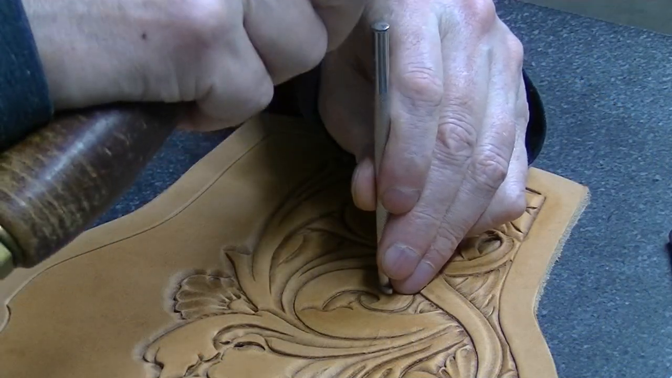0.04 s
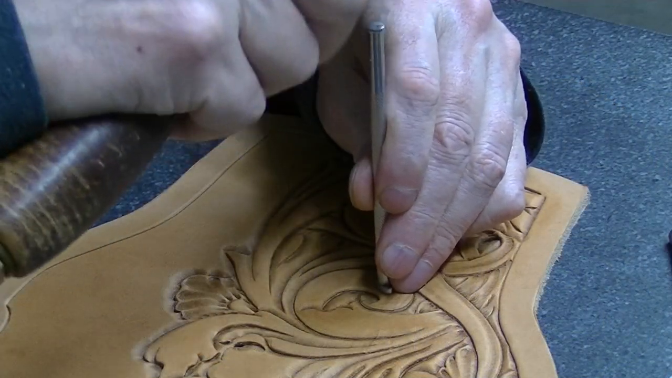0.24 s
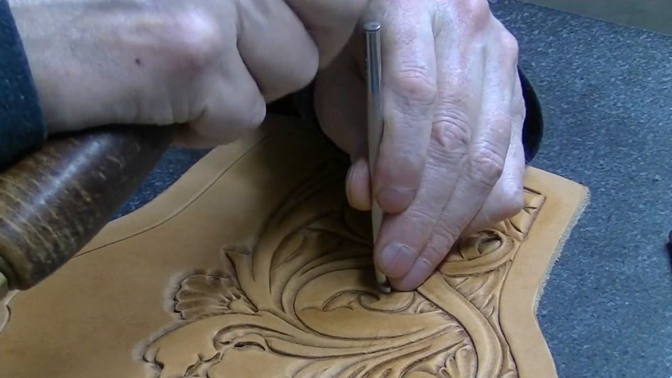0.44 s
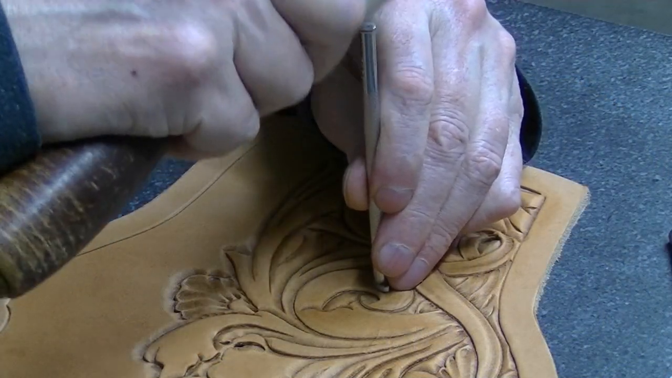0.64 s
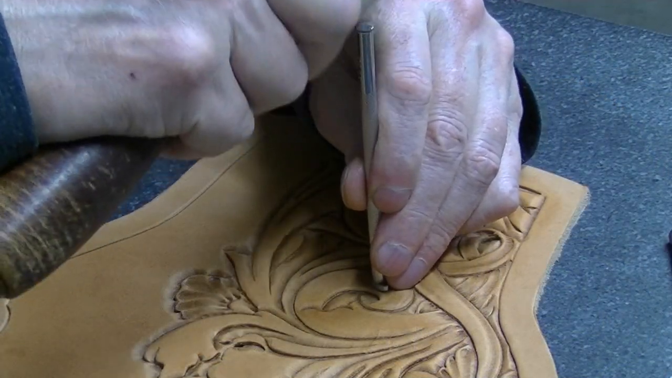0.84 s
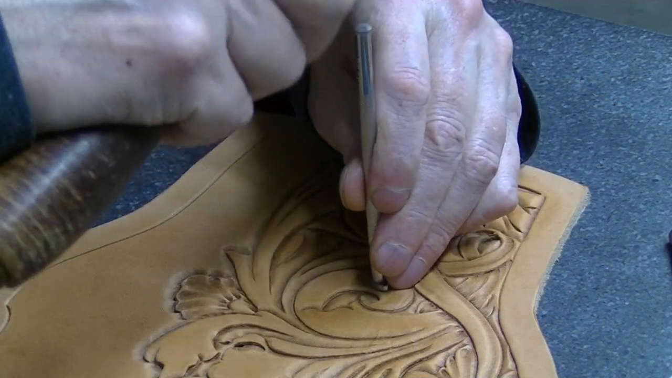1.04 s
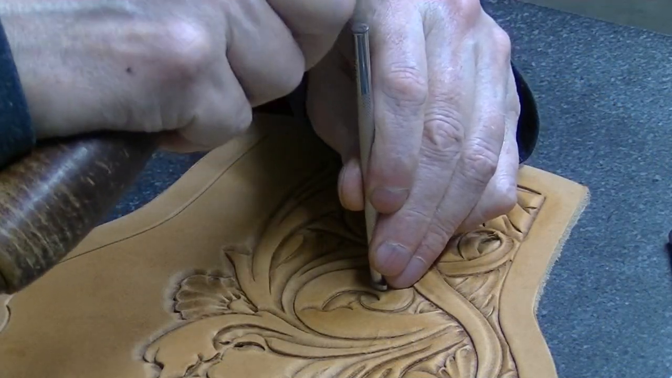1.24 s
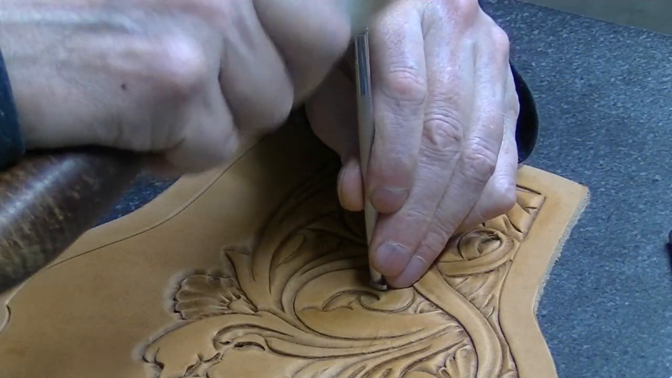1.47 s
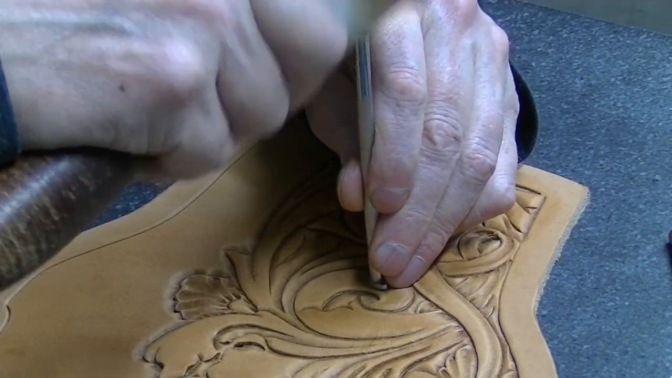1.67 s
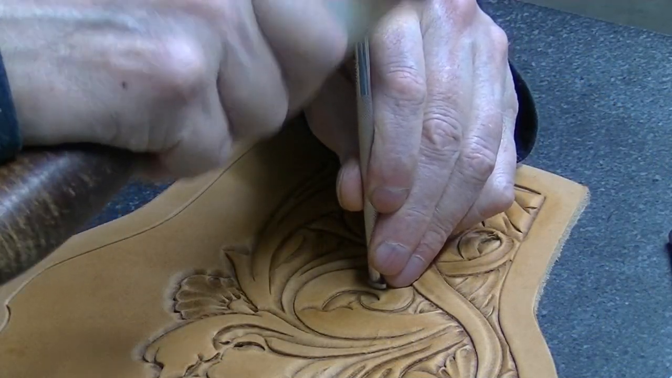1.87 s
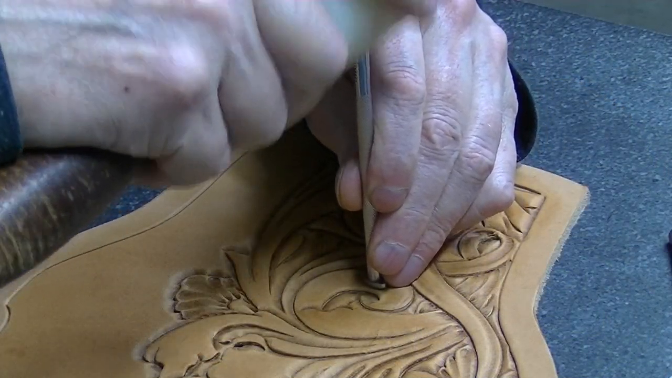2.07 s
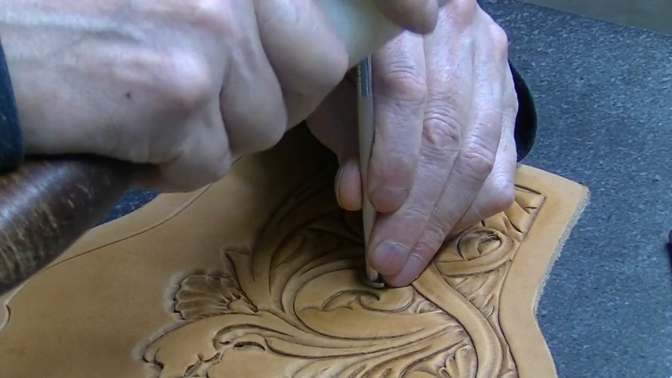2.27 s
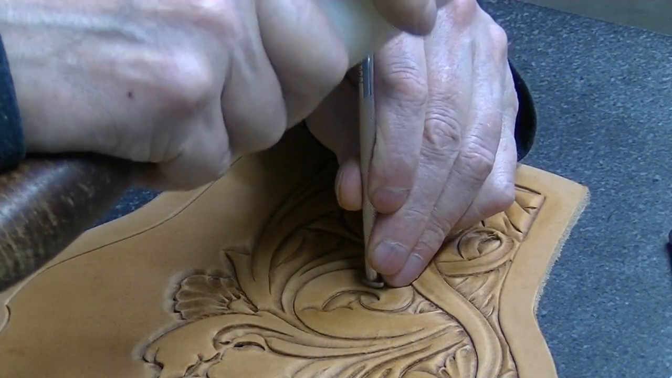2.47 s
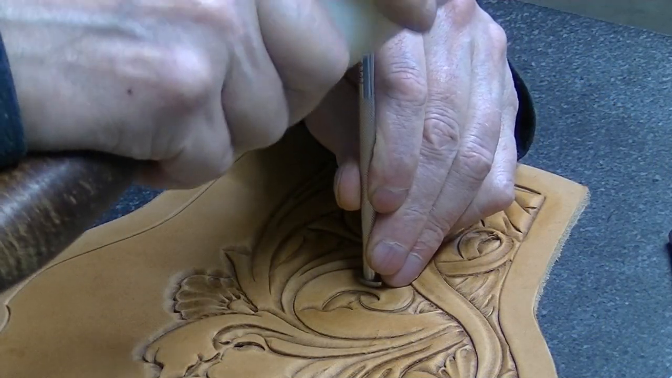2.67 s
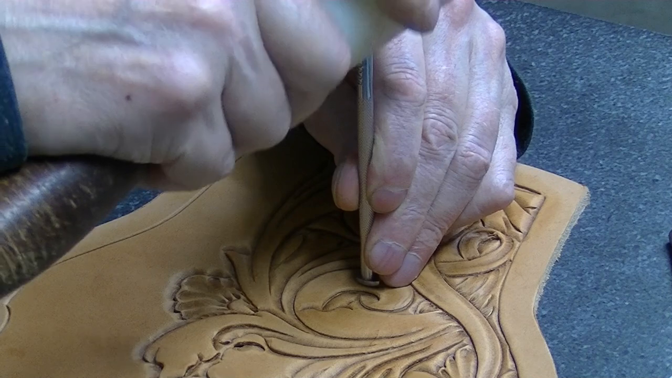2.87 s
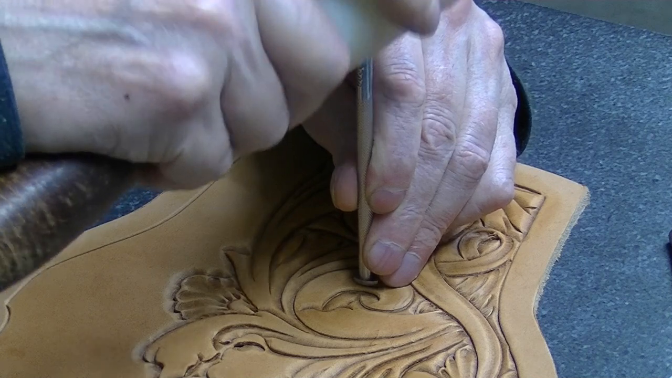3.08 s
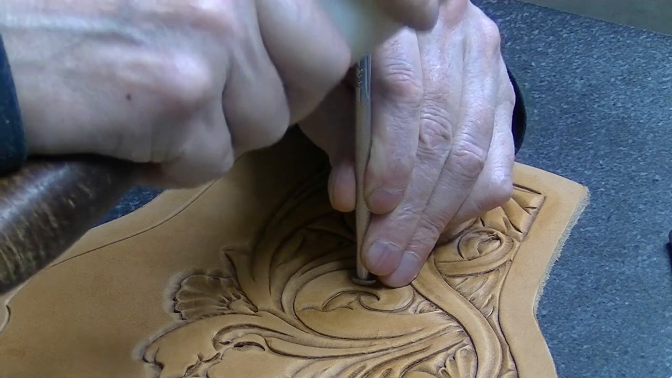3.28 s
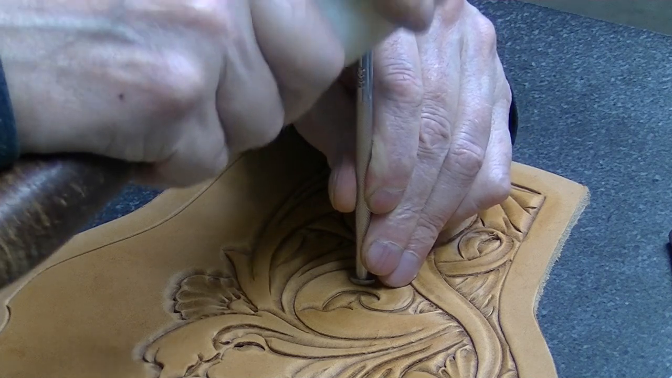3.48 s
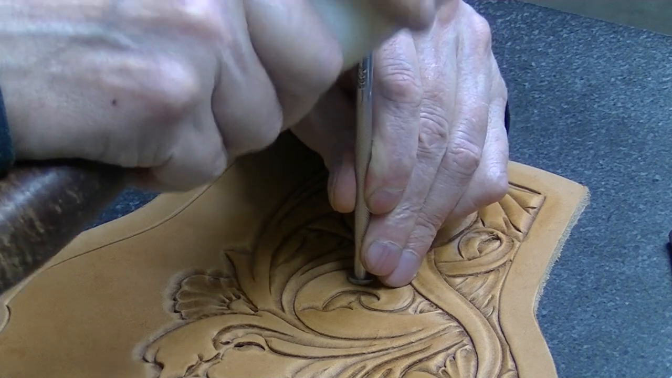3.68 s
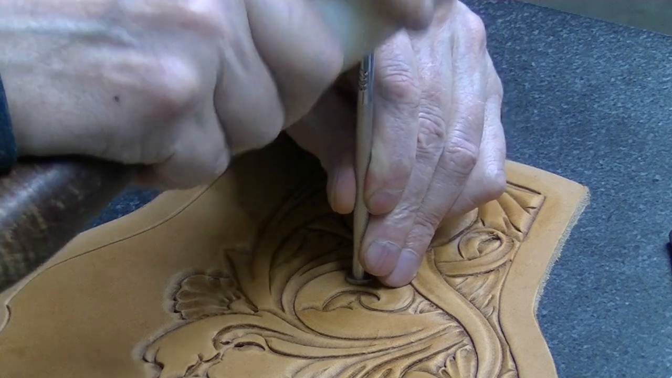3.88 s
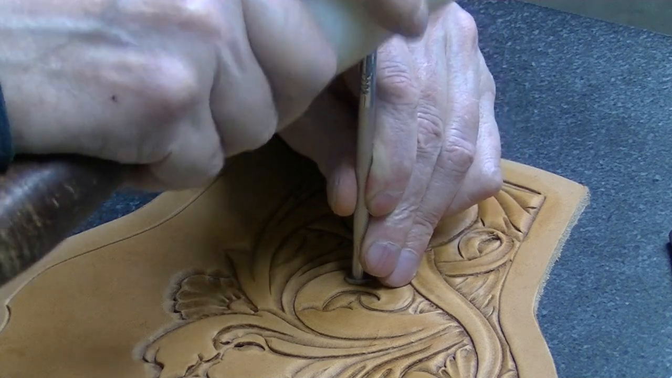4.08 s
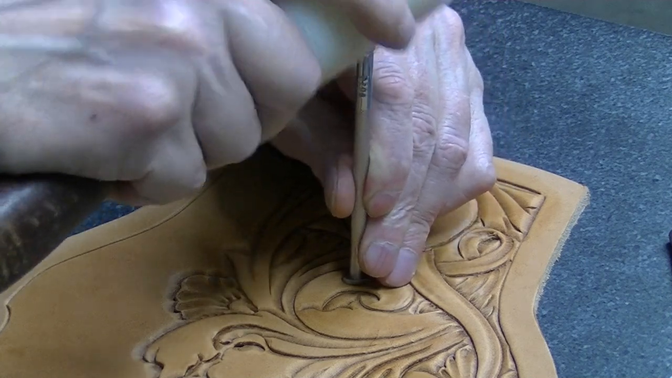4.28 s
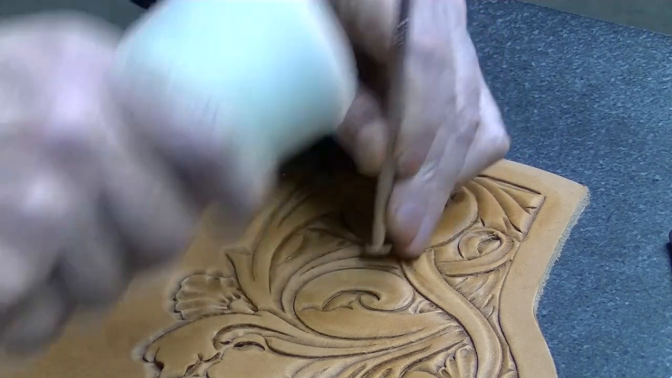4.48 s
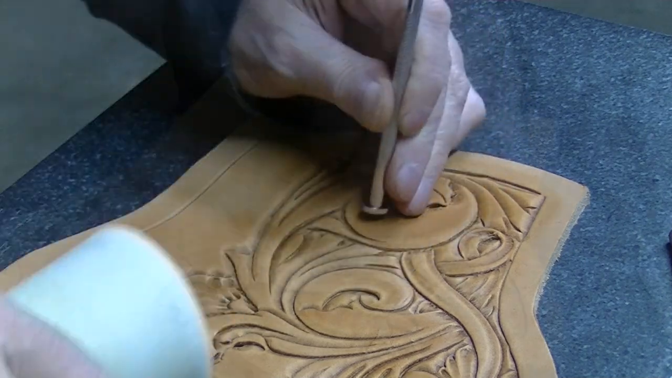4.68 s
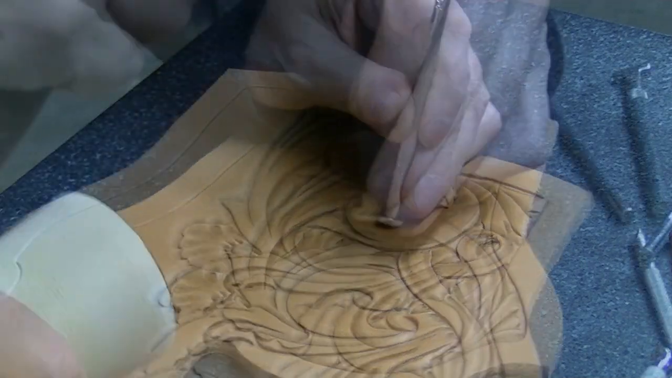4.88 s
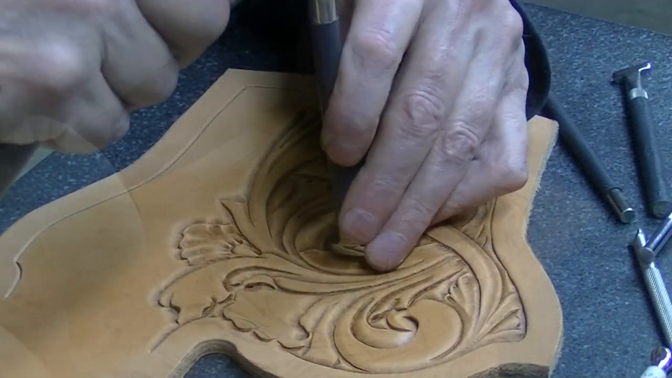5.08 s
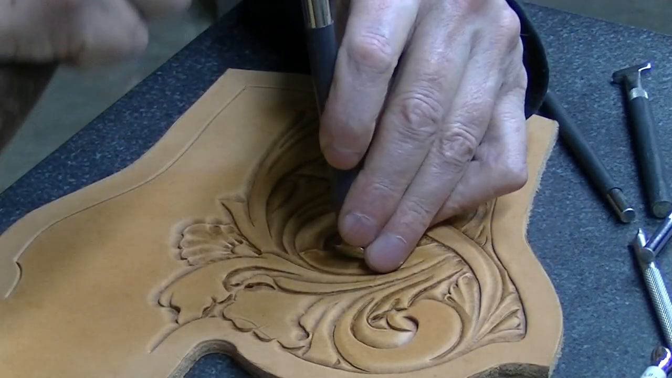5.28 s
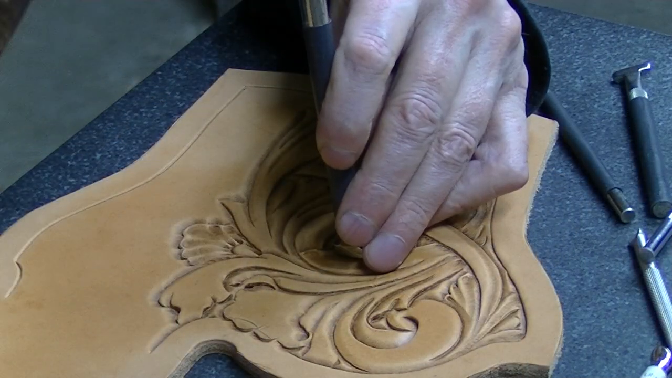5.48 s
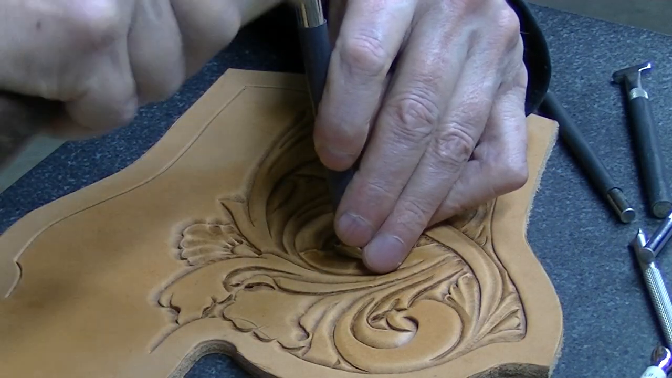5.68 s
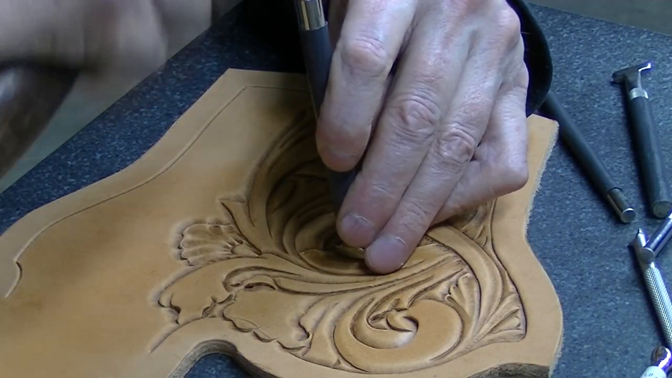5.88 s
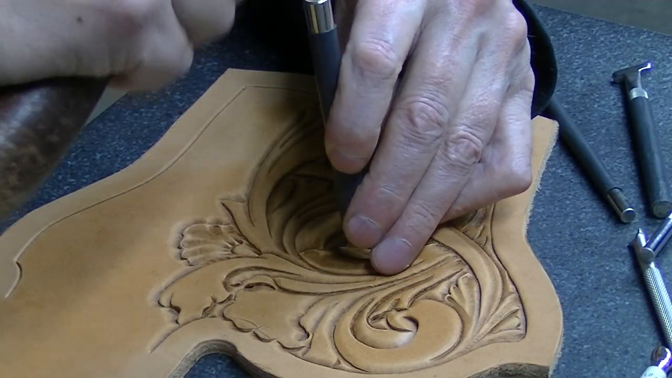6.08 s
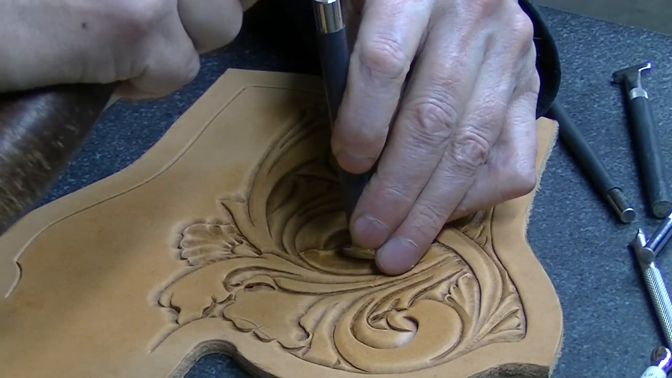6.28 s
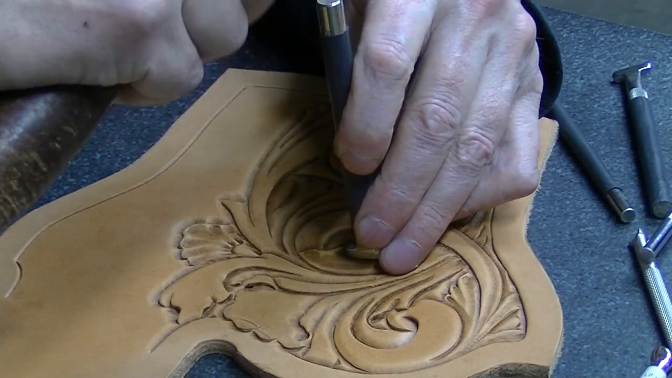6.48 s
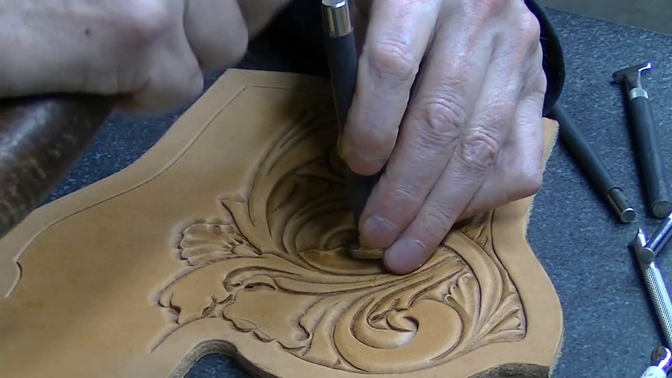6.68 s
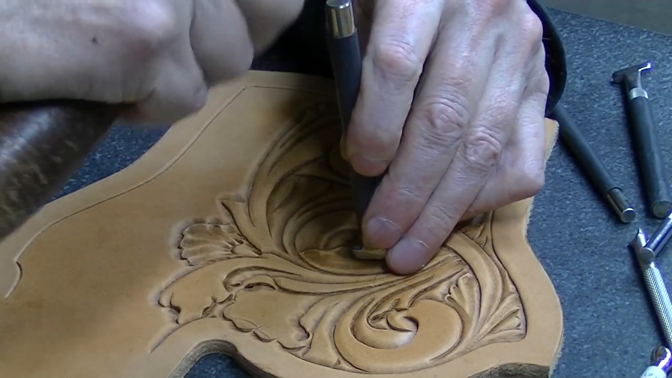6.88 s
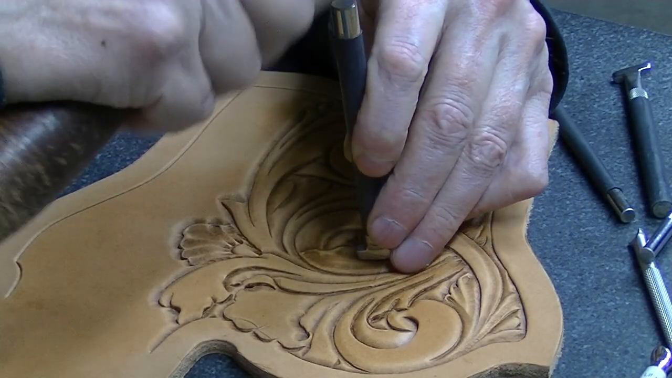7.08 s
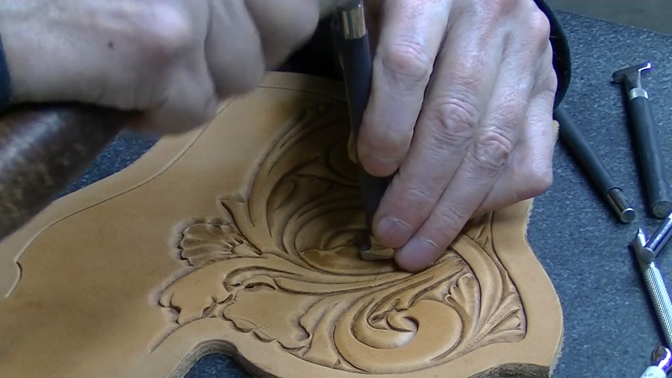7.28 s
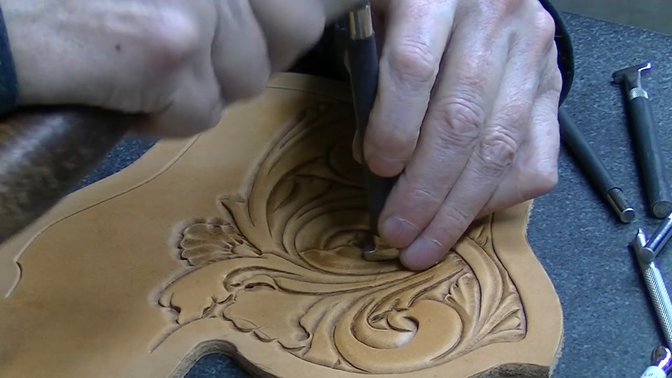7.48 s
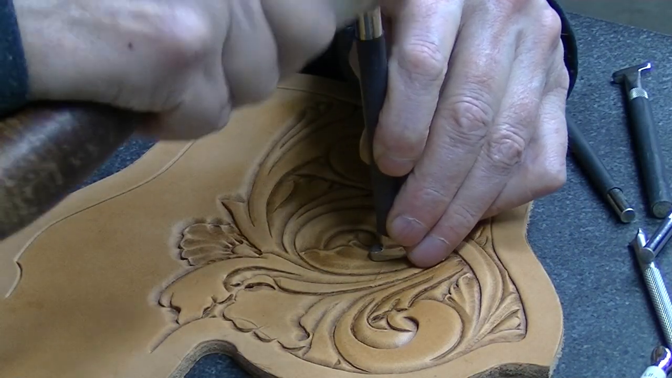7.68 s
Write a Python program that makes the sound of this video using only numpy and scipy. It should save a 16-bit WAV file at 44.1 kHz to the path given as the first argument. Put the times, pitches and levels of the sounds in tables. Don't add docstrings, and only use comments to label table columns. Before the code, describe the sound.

A hard mallet taps a thin steel stamp into leather about five times a second, pauses, then taps a thicker stamp louder and heavier.

```python
import sys
import numpy as np
from scipy import signal
from scipy.fft import rfft, irfft
from scipy.io import wavfile
from scipy.ndimage import uniform_filter1d

SR = 44100
rng = np.random.default_rng(int(sys.argv[2]) if len(sys.argv) > 2 else 0)


def amplitude_ratio(level_db):
    exponent = np.asarray(level_db, float) / 20
    return 10 ** exponent


def generate_wav(signal):
    frames = np.transpose(np.atleast_2d(signal))
    scaled = np.clip(frames, -1, 1) * 32767
    pcm = np.round(scaled).astype(np.int16)
    wavfile.write(sys.argv[1], SR, pcm)


N = 341334
T = np.arange(N) / SR
LEAD = SR // 10

# t/s, strength/dB, off-centre aim/dB, brightness/dB
THIN_BLOWS = [(-0.04, -13.5, 1, -1.5), (0.1545, -12, 2, -4.5), (0.356, -10.5, 0.5, -1.3),
              (0.5615, -11, 0.5, -2), (0.7615, -13, 1, -3.5), (0.9505, -12.5, 2, 2), (1.1485, -11, 0, 1),
              (1.3465, -12, 1.5, -1.5), (1.534, -12, 1, -1), (1.726, -12.5, 0.5, -0.5),
              (1.922, -12, 1.5, -2), (2.1125, -13, 1, -1.5), (2.2985, -13.5, 2, -2),
              (2.4955, -13, 1.5, -1.5), (2.694, -13.5, 1, -0.5), (2.884, -13, 1.5, 4.5),
              (3.0775, -13.5, 1.5, 3), (3.2765, -13, 1.5, -2.5), (3.471, -13.5, -0.5, -1.5),
              (3.659, -15, -0.5, -0.5), (3.851, -13.5, -2, -1.5), (4.0435, -14, -21, 2.5),
              (4.236, -14, 1, 3.5)]
THICK_BLOWS = [
    (5.6947, -13.5, -1, 5.5),
    (5.9461, -12.5, 12, 2.5),
    (6.166, -11.5, 5.5, -5.5),
    (6.381, -13, 0, -8.5),
    (6.599, -13, 1, -2),
    (6.813, -13, 3, -1.5),
    (7.024, -13, -5, -10.5),
    (7.2355, -13, 0.5, -4),
    (7.447, -14.5, -6, -5),
    (7.6531, -13.5, -6, 1),
]
# f/Hz, level/dB, t60/s
THIN_CRACK = [(718, -9, 0.017), (1056, -2, 0.008), (1757, -7, 0.0095), (2462, 1.5, 0.0072),
              (3775, -13.5, 0.024), (4420, -5.5, 0.0054), (6500, -15.5, 0.0032), (7050, -17, 0.0038),
              (11200, -17, 0.0016), (12500, -23.5, 0.0019)]
THICK_CRACK = [(875, -19, 0.019), (1172, 13, 0.0082), (1457, 11, 0.0057), (2500, 10, 0.0019),
               (3600, 4, 0.013), (5040, 10.5, 0.0017), (7600, -45, 0.0024), (10100, 3.5, 0.0046),
               (13500, -40, .003)]
# f/Hz, level/dB, t60/s
THIN_RING = [
    [(2170, -6.5, 0.029), (2470, -5, 0.0022)],
    [(2500, -4, 0.0026), (2910, -9, 0.0077)],
    [(3778, -6.5, 0.035), (3755, -21, 0.0073)],
    [(4000, 1.5, 0.0044), (4410, -16, 0.013)],
]
THICK_RING = [
    [(2133, 9.05, 0.029), (2256, 5.1, 0.006)],
    [(2500, 9.5, 0.0026), (2700, 6.5, 0.016)],
    [(3833, 0.66, 0.022), (3950, 0.75, 0.009)],
    [(4490, 8.5, 0.01), (4720, -16, 0.0092)],
]
# delay/s, level/dB
THIN_CHATTER = [(0, 3), (.0006, 0.5), (.0012, 4.5), (.0021, 3)]
THICK_CHATTER = [(0, 11.5), (.0006, -16.5), (.0012, 5), (.0019, -24)]
# f/Hz, level/dB
THIN_CLAP = [(400, 12), (900, 0), (1500, 6), (1950, -1), (2900, 6.5), (3400, -15), (4700, -17),
             (5500, -16.5), (6500, -13), (8000, -23), (13000, -33.5)]
THICK_CLAP = [(400, 18), (900, 11), (1500, 15.5), (1950, 4.5), (2700, -7.5), (3200, 10), (4700, 0.5),
              (5500, 5.5), (6500, -0.5), (8000, -4), (13000, -10.5)]
# low/dB, aim/dB past which the low ring is lost, high/dB,
# high dB per aim dB, high dB per brightness dB, top dB per aim dB
THIN_SHAFT = (0.4, 6, 0.1, 2.73, 0.62, 0.26)
THICK_SHAFT = (5.5, 10, 11.5, -0.2, 0.7, 0.2)
LOW_LOSS = 2.2
STRIKE_LAG_S = .0005

# f/Hz, level/dB, t60/s
BENCH_MODES = [(63.8, -53, 0.37), (123, -24, 0.11), (138.1, -36, 0.45), (157.9, -38.5, 0.52),
               (171.73, -22, 0.44), (197.2, -24, 0.26), (214.1, -35, 0.87), (228.5, -29, 0.37),
               (261.9, -39, 0.48), (280.54, -26.5, 0.51), (287.1, -24, 0.23), (308.4, -26.5, 0.34),
               (342.8, -27, 0.2), (373.5, -40.5, 0.87), (421, -29.5, 0.049), (464, -26, 0.19),
               (492, -29, 0.13), (534, -27, 0.16)]
BENCH_SWING = [1, 1, -1, -1, 1, -1, 1, 1, -1, -1, 1, -1, 1, 1, 1, -1, 1, 1]
# f/Hz, level/dB, t60/s
SLAB_KNOCK = [(245, -10.5, 0.012)]
# f/Hz, gain/dB
BENCH_PICKUP = [(30, -42), (62, -19), (85, -8), (120, -2.45), (330, -0.5), (520, -4)]
PUSH_S, THUMP_LAG_S = .002, .0018
THIN_THUMP_DB, THICK_THUMP_DB = 0, 6.5

# delay/s, level/dB
ECHOES = [(.0075, -4), (.012, -24)]
# f/Hz, gain/dB
ECHO_COLOUR = [(800, -14.5), (2500, -8.5), (3800, -3), (5000, -3.5), (12000, -9.5)]
# f/Hz, level/dB, t60/s
ROOM = [(536, -30, 0.45), (985, -26, 0.4), (2050, -27.5, 0.39), (3560, -28.5, 0.42), (6120, -29.5, .36),
        (9200, -29.5, 0.35), (13100, -27.5, 0.23)]
ROOM_START_S, ROOM_RISE_S = .003, .006

# start/s, end of hold/s, level/dB, fall/(dB/s)
DRONES = [
    (-1, .3, -45, 6),
    (3.15, 4.75, -53, 60),
    (.6, 1.5, -56, 9),
    (4.2, 4.8, -55, 80),
]
DRONE_HZ = [59.7, 58.5, 73.8, 75.]
DRONE_RISE_DB_S = 20

# f/Hz, level/dB
AIR = [(25, -36), (45, -7), (80, 0.5), (110, 4), (200, -1.5), (260, -1), (410, -3), (500, -10.5),
       (1650, -13.5), (2200, -19.5), (5000, -29), (11000, -58), (15000, -40), (15800, -59)]
# t/s, level/dB
AIR_SWELL = [(0, 2.5), (4.4, -4.5), (5.05, -9), (7.74, -4.5)]
# f/Hz, level/dB
WHINE = [(14783, -79)]
AIR_DB = -49.5

# middle t/s, level/dB, half length/s
STROKES = [
    (4.503, -74, 0.066),
    (4.902, -72.5, .02),
]
SLEEVE_REST_DB, SLEEVE_FALL_DB_S = -82, 69
# t/s, peak level/dB, f/Hz, t60/s
TICKS = [
    (4.733, -36.5, 960, 0.018),
    (4.7338, -44, 1330, .015),
    (4.735, -45, 1840, .015),
    (5.487, -45, 12500, .002),
    (5.487, -49, 2500, 0.0045),
]

# f/Hz, gain/dB
MIC = [(100, -3.5), (13000, 0.23), (15000, -11), (16500, -32)]
# f/Hz, left minus right/dB
LEAN = [(100, -2), (400, -4.5), (1200, -3), (4000, -.5), (12000, -1.8)]
# f/Hz, gain/dB
BASS_CUT = [(25, -16), (45, -8), (60, 0)]
SPACING = .4
DUCK_DB, DUCK_BACK_S = 11.5, 0.08
CEILING = .6


def colour(x, points):
    hz = np.maximum(np.fft.rfftfreq(x.shape[-1], 1 / SR), 1)
    hz_at, db_at = np.transpose(points)[:2]
    gain = amplitude_ratio(np.interp(np.log(hz), np.log(hz_at), db_at))
    return irfft(rfft(x) * gain, x.shape[-1])


def ring(modes, seconds, late=0.):
    hz, db, t60 = np.transpose(modes)[:, :, None]
    t = np.maximum(np.arange(int(seconds * SR)) / SR - late, 0)
    decay = np.exp(-np.log(1000) * t / np.maximum(t60, .002))
    return amplitude_ratio(db) * np.sin(2 * np.pi * hz * t) * decay


def add(track, s, sound):
    k = int(s * SR) + LEAD
    track[k:k + len(sound)] += sound[:len(track) - k]


def stamp(blows, crack, rings, chatter, clap, shaft):
    near, far = np.zeros((2, N + LEAD))
    body = np.vstack((crack, *rings))
    shaft_from = len(crack)
    group = np.repeat(np.arange(5), [shaft_from, 2, 2, 2, 2])
    side = -(-1.) ** (np.arange(len(body)) // 2)
    chance = rng.standard_normal((len(blows), 50))
    click = np.roll(np.eye(1, 256)[0], 64)
    low, edge, high, per_aim, per_bright, top_per_aim = shaft
    for (s, db, aim_db, bright_db), c in zip(blows, chance):
        low_db = low - LOW_LOSS * max(aim_db - edge, 0)
        high_db = high + per_aim * aim_db + per_bright * bright_db
        top_db = 0.95 * bright_db + top_per_aim * aim_db
        modes = body.copy()
        modes[:, 0] *= 1 + .006 * c[:len(body)]
        modes[:, 1] += c[20:20 + len(body)]
        modes[:, 1] += db + np.array([0, low_db, aim_db, high_db, top_db])[group]
        modes[:, 1] += bright_db * np.clip(np.log2(body[:, 0] / 4600) * 3, 0, 1)
        add(far, s, side[shaft_from:] @ ring(modes[shaft_from:], .06))
        clap_sound = colour(colour(click, clap), [(4000, 0), (5500, bright_db)])
        add(far, s, amplitude_ratio(db + 21.5) * clap_sound)
        modes[shaft_from:, 1] -= 8
        for k, (lag, chatter_db) in enumerate(chatter):
            late = STRIKE_LAG_S + lag * (1 + .04 * c[40 + k])
            add(near, s, amplitude_ratio(chatter_db - 6.0) * side @ ring(modes, .03, late))
            modes[:, 1] -= 0.28 * np.maximum(np.log2(body[:, 0] / 3000), 0)
    return np.array([near, far])


def bench(seconds=0.62):
    kicks = np.zeros(N + LEAD)
    for blows, thump_db in ((THIN_BLOWS, THIN_THUMP_DB), (THICK_BLOWS, THICK_THUMP_DB)):
        mean_db = np.mean(blows, 0)[1]
        for s, db, *_ in blows:
            kick = amplitude_ratio(np.array([thump_db + 0.51 * (db - mean_db)]))
            add(kicks, s + STRIKE_LAG_S + THUMP_LAG_S, kick)
    t = np.arange(SR // 40) / SR / PUSH_S
    push = 2 * (1 - t) * np.exp(-t) / (PUSH_S * SR)
    modes = BENCH_SWING @ ring(BENCH_MODES, seconds) - ring(SLAB_KNOCK, seconds)[0]
    swing = np.pad(np.convolve(push, modes), (0, LEAD))
    swing = colour(swing, BENCH_PICKUP)[:-LEAD]
    return signal.fftconvolve(kicks, swing)[:N + LEAD]


def echoes(x):
    x = colour(x, ECHO_COLOUR)
    total = np.zeros((2, len(x)))
    for k, (lag_s, db) in enumerate(ECHOES):
        lag = int(lag_s * SR)
        total += amplitude_ratio(db) * np.array([np.roll(x, lag), np.roll(x, lag + 3 * (-1) ** k)])
    return total


def room(x, alike=0.77):
    t = np.arange(int(.6 * SR)) / SR
    hz, db, t60 = np.transpose(ROOM)
    mid, side = rng.standard_normal((2, len(t)))
    pair = rfft(mid + (1 - alike) * 2 * side * np.array([[1], [-1]]))
    place = np.interp(np.log(np.fft.rfftfreq(len(t), 1 / SR) + 1), np.log(hz), np.arange(len(hz)))
    tail = np.zeros((2, len(t)))
    for k in range(len(hz)):
        share = np.maximum(1 - abs(place - k), 0)
        tail += irfft(pair * share, len(t)) * amplitude_ratio(db[k] - 60 * t / t60[k])
    tail *= np.clip((t - ROOM_START_S) / ROOM_RISE_S, 0, 1) * amplitude_ratio(-5.0)
    return signal.fftconvolve(x[None], tail, axes=1)[:, :x.shape[-1]]


def drone(hz, start, end, db, fall, waver=0.12):
    slow = uniform_filter1d(rng.standard_normal(N), SR // 8) * np.sqrt(SR / 8)
    loss_db = DRONE_RISE_DB_S * np.maximum(start - T, 0) + fall * np.maximum(T - end, 0)
    return np.sqrt(2) * amplitude_ratio(db - loss_db) * (1 + waver * slow) * np.sin(2 * np.pi * hz * T)


def air():
    mid, side = colour(rng.standard_normal((2, N)), AIR)
    side = colour(side, [(60, -16), (300, -7.5), (800, -7.5), (8000, 5.5)])
    whine_hz, whine_db = WHINE[0]
    whine = amplitude_ratio(whine_db) * np.sin(2 * np.pi * whine_hz * T) * np.clip((5.0 - T) / 0.54, 0, 1)
    level = amplitude_ratio(AIR_DB + np.interp(T, *np.transpose(AIR_SWELL))) / mid.std()
    return level * (mid + side * np.array([[1], [-1]])) + whine


def sleeve():
    grains = rng.standard_normal((2, N)) * amplitude_ratio(2.0 * rng.exponential(size=N))
    hiss = colour(grains, [(500, -24), (3000, 4), (8000, -2), (11500, 2.0), (14300, -8), (15300, -45)])
    strokes = [db - SLEEVE_FALL_DB_S * np.maximum(abs(T - s) - half, 0) for s, db, half in STROKES]
    level_db = np.maximum(np.max(strokes, axis=0), SLEEVE_REST_DB)
    return hiss / hiss.std() * amplitude_ratio(level_db + 9.5)


def ticks():
    track = np.zeros(N + LEAD)
    for s, db, hz, t60 in TICKS:
        add(track, s, ring([(hz, db, t60)], .05)[0])
    return track


def scene():
    thin = stamp(THIN_BLOWS, THIN_CRACK, THIN_RING, THIN_CHATTER, THIN_CLAP, THIN_SHAFT)
    thick = stamp(THICK_BLOWS, THICK_CRACK, THICK_RING, THICK_CHATTER, THICK_CLAP, THICK_SHAFT)
    near, far = colour(thin + thick + ticks(), MIC)
    no_bass = signal.butter(2, 350, "highpass", fs=SR, output="sos")
    near = signal.sosfilt(no_bass, near)
    direct = np.array([near, near + SPACING * (np.roll(near, 1) - near)])
    struck = direct + echoes(near) + bench() + room(far * amplitude_ratio(-4.0))
    drones = sum(drone(hz, *swell) for hz, swell in zip(DRONE_HZ, DRONES))
    left, right = struck[:, LEAD:] + drones + air() + sleeve()
    left = colour(left, [(hz, db / 2) for hz, db in LEAN])
    right = colour(right, [(hz, -db / 2) for hz, db in LEAN])
    return np.array([left, right])


def top_cut(x):
    return signal.sosfilt(signal.butter(12, 16790, fs=SR, output="sos"), x)


def record(dry):
    dip_db = np.zeros(N)
    for s, *_ in THICK_BLOWS:
        ramp = np.clip(1 - (T - s) / DUCK_BACK_S, 0, 1) * (T >= s)
        dip_db = np.maximum(dip_db, DUCK_DB * ramp)
    held = CEILING * np.tanh(dry * amplitude_ratio(-dip_db) / CEILING)
    return top_cut(colour(held, BASS_CUT))


dry = scene()
out = record(dry)
generate_wav(out)
```